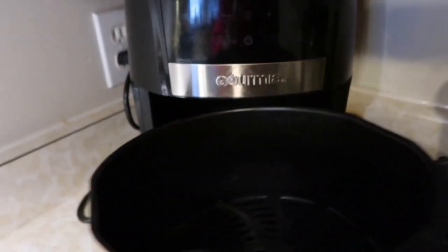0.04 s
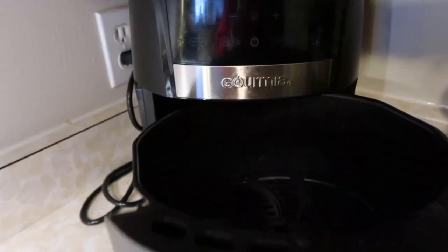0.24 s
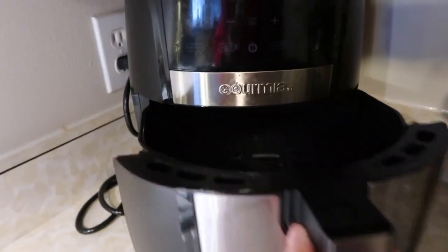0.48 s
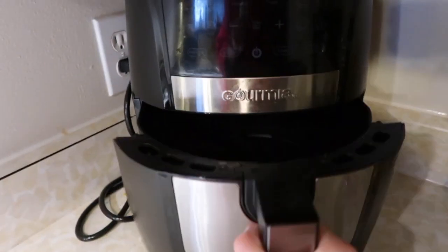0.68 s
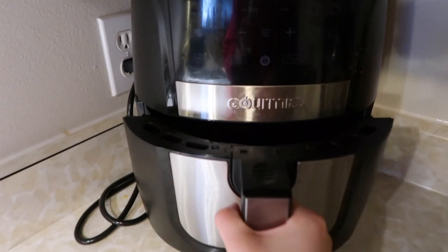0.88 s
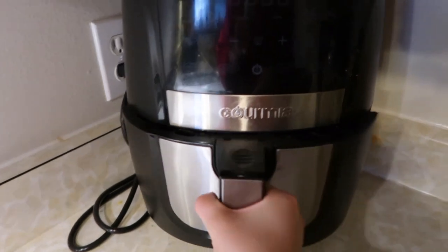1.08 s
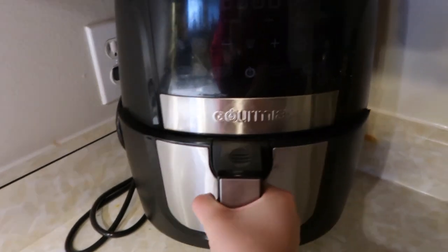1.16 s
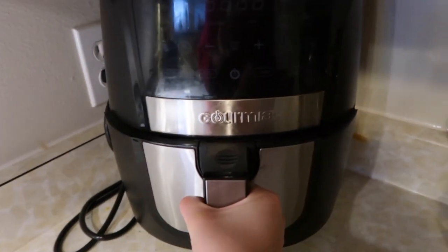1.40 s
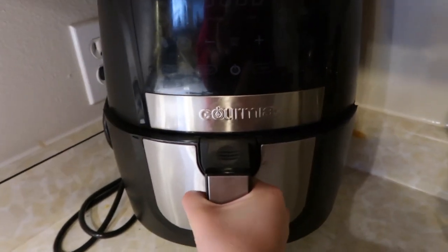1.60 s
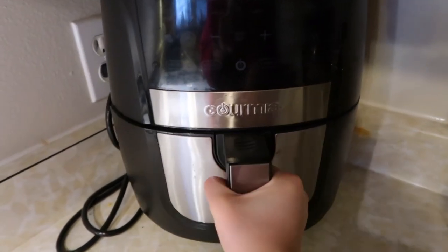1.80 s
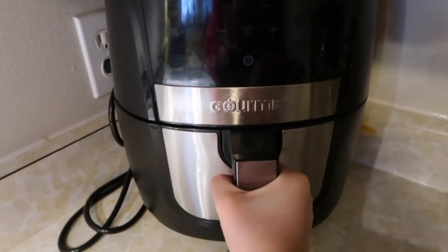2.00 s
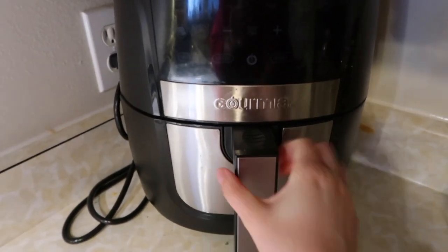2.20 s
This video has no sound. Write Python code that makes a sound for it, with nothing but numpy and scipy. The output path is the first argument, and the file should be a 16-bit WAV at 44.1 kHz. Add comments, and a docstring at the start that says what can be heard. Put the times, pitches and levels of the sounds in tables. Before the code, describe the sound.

Close up in a small, quiet kitchen, an air fryer basket clatters and rings briefly as it goes in. It slides with ticks and hollow bumps, pauses, then is pushed home until the latch clicks.

```python
"""Knocks and scrapes, a short lull, then a sharp snap: an air fryer's metal basket is being put in.
It is set on the lip of its housing, slid along the rails, and pushed until the latch snaps home.
The pan rings while it is out in the open; deeper in, the hollow plastic housing booms instead.
Plastic edges tick as they catch on the rails. Heard from close by in a small, quiet kitchen."""
import sys
import numpy as np
from scipy import signal
from scipy.fft import rfft, irfft
from scipy.io import wavfile
from scipy.ndimage import uniform_filter1d

SR = 44100
rng = np.random.default_rng(int(sys.argv[2]) if len(sys.argv) > 2 else 0)


def generate_wav(signal):
    """Clip the signal to [-1, 1] and save it as 16-bit WAV at the path in sys.argv[1]."""
    frames = np.transpose(np.atleast_2d(signal))
    scaled = np.clip(frames, -1, 1) * 32767
    pcm = np.round(scaled).astype(np.int16)
    wavfile.write(sys.argv[1], SR, pcm)


N = 99225
SIZE = 4096   # samples in one short burst or filter
T = np.arange(N) / SR
HZ = np.arange(SIZE // 2 + 1) * SR / SIZE

# The metal pan's tones. Each row: pitch in Hz, level in dB, ring time (seconds to fade by 60 dB).
PAN = [(193.1, 5, 0.14), (280.6, 4.5, 0.22), (466.6, -6, 0.27), (623, -11, 0.34), (749, 2, 0.083),
       (868, -13, 0.51), (987, -3, 0.21), (1164, -4.5, 0.31), (1400, -11, 0.29), (1470, -18.5, 0.73),
       (2030, -17.5, 0.47), (2094, -21, 0.24), (2180, -12, 0.26), (2740, -16.5, .22), (3203, -21, 0.24),
       (4160, -16, 0.12)]


def from_db(db):
    """Turn decibels into a number to multiply by."""
    return 10 ** (np.asarray(db) / 20)


def at_hz(points, hz, column=1):
    """Read between a table's rows, giving every octave the same space."""
    points = np.array(points)
    return np.interp(np.log(hz + 1), np.log(points[:, 0]), points[:, column])


def add(out, start, x):
    """Mix x in at a start time in seconds."""
    i = int(start * SR)
    out[i:i + len(x)] += x[:N - i]


def through(x, response):
    """Pass a sound through a filter, keeping its length."""
    return signal.fftconvolve(x, response)[:len(x)]


def make_filter(gain):
    """A filter with these gains that responds as early as it can (minimum phase)."""
    cepstrum = irfft(np.log(gain + 1e-9))
    cepstrum[1:SIZE // 2] *= 2
    cepstrum[SIZE // 2 + 1:] = 0
    return irfft(np.exp(rfft(cepstrum)))


def coloured(burst, colour):
    """Give a burst a new balance of bass and treble, keeping its fine detail."""
    own_colour = np.sqrt(uniform_filter1d(np.abs(rfft(burst)) ** 2, size=25) + 1e-9)
    return through(burst, make_filter(from_db(at_hz(colour, HZ)) / own_colour))


def grains(count, per_second, spread_db):
    """Random clicks of uneven size, with an average power of 1."""
    hits = rng.random(count) < per_second / SR
    sizes = from_db(spread_db * np.minimum(rng.exponential(1, count), 4))
    clicks = hits * sizes * rng.choice([-1, 1], count)
    return clicks / (clicks.std() + 1e-9)


def uneven(per_second, depth_db):
    """A level that wanders at random, with an average power of 1."""
    gain = from_db(depth_db * np.interp(T * per_second, np.arange(SIZE), rng.standard_normal(SIZE)))
    return gain / np.sqrt(np.mean(gain ** 2))


def click(db, cutoff_hz):
    """A single contact; a softer one has a lower cut-off and sounds duller."""
    lowpass = signal.butter(2, min(cutoff_hz, SR / 3), fs=SR, output="sos")
    return from_db(db) * signal.sosfilt(lowpass, signal.unit_impulse(SIZE) + 1e-18)


def ring(force, tones):
    """An object answers a force with its own fading tones."""
    t = T[:int(max(ring_s for _, _, ring_s in tones) * SR)]
    response = sum(from_db(db - 60 * t / ring_s) * np.sin(2 * np.pi * hz * t) * (-1) ** k
                   for k, (hz, db, ring_s) in enumerate(tones))
    return through(force, response)


def background_noise():
    """Faint rumble shared by both sides and microphone hiss in each; both dip midway and come back."""
    # The colours of the two noises. Each row: frequency in Hz, level in dB.
    rumble_colour = [(25, -28), (45, -21.5), (110, -34), (200, -33), (400, -50.5), (1000, -51),
                     (3000, -72.5)]
    hiss_colour = [(40, -46), (150, -42), (400, -37.5), (1000, -43), (2000, -48), (4000, -51), (8000, -61),
                   (12000, -66), (15000, -75.5)]
    # How both rise and fall. Each row: time in seconds, level in dB.
    levels = [(0, -2), (.22, -2.5), (.6, -18), (1.35, -15), (1.7, -10.5), (2.15, -4.5)]
    white = rng.standard_normal((3, N + SIZE))
    rumble, left, right = [through(noise, make_filter(from_db(at_hz(colour, HZ))))[SIZE:]
                           for noise, colour in zip(white, (rumble_colour, hiss_colour, hiss_colour))]
    return from_db(np.interp(T, *np.transpose(levels))) * (rumble + np.array([left, right]))


def kitchen_echo(sound):
    """A wash of echo that builds up quickly and lasts longest in the bass."""
    # The room's echo. Each row: frequency in Hz, level in dB, seconds to fade by 60 dB.
    room = [(48, -0.5, 1.1), (146, -13.5, 1.15), (389.6, -13, 0.5), (1087, -13.5, 0.43), (2883, -10, 0.34),
            (8130, -6.5, 0.18)]
    t, hz = T[:SR], np.arange(SR // 2 + 1)
    noise = rfft(rng.standard_normal(SR))
    centres = np.geomspace(40, 15000, 12)
    build_up = 1 - np.exp(-(t / 0.0019) ** 2)
    tail = 0
    for centre, pick in zip(centres, np.eye(len(centres))):
        share = np.interp(np.log(hz + 1), np.log(centres), pick)   # this band's part of each frequency
        fade = from_db(-60 * t / at_hz(room, centre, column=2))
        band = irfft(noise * share) * build_up * fade
        gain = from_db(at_hz(room, centre)) * np.sqrt(np.mean(share ** 2))
        tail += gain * band / np.linalg.norm(band)
    return through(sound, tail)


def rim(force):
    """The rim and rails ring briefly and brightly when knocked or rubbed."""
    # Their tones. Each row: pitch in Hz, level in dB.
    tones = [(1388, -50.5), (1483, -42), (1625, -47), (2072, -54.5), (2222, -53), (2400, -49), (2650, -54),
             (3190, -60), (3700, -50.5), (4130, -48.5), (4330, -44), (5350, -50), (6300, -42), (8480, -58)]
    ring_s = 0.04
    return ring(force, [(hz, db, ring_s) for hz, db in tones])


def scrapes():
    """The basket rubs along its rails in many tiny slips, which keep the rim and pan singing."""
    # The rubs. Each row: time of hardest rub, swell and release in seconds, level and treble in dB.
    rubs = [(0.347, 0.027, 0.015, -24.5, 13.5), (.44, 0.015, 0.11, -32.5, 5),
            (0.654, 0.086, 0.017, -25, 11), (0.714, 0.033, 0.13, -41, 19), (0.83, 0.044, 0.026, -34.5, 12),
            (0.924, 0.007, 0.017, -38.5, 15), (1.001, 0.046, 0.18, -41.5, -1), (1.13, 0.009, 0.03, -42, 5),
            (1.189, 0.02, 0.01, -29.5, 4.5), (1.222, 0.01, 0.013, -33.5, -16),
            (1.758, 0.022, 0.15, -44, 10.5), (1.858, 0.054, 0.016, -27.5, -16), (2.0, .03, 0.022, -67, -9)]
    # The colour of rubbing. Each row: frequency in Hz, level in dB.
    colour = [(40, -3), (130, 20.5), (300, 14), (700, 5.5), (1500, -4), (2500, -12), (4500, -22.5),
              (8000, -29), (11500, -35.5), (14000, -50)]
    treble_hz, rim_db, pan_db = 2520, 6.5, -39.5
    slips = grains(N, per_second=1000, spread_db=1)
    slips *= uneven(per_second=140, depth_db=1.5)   # the rub sticks and lets go
    low = signal.sosfilt(signal.butter(1, treble_hz, fs=SR, output="sos"), slips)
    treble = slips - low
    force = 0
    for peak, swell, release, db, treble_db in rubs:
        pressure = np.exp(-np.where(T < peak, ((peak - T) / swell) ** 2, (T - peak) / release))
        force += from_db(db) * pressure * (low + from_db(treble_db) * treble)
    body = make_filter(from_db(at_hz(colour, HZ)))
    rub = through(force, body / np.linalg.norm(body))
    return rub + from_db(rim_db) * rim(rub) + from_db(pan_db) * ring(force, PAN)


def catches():
    """Plastic edges catch on the rails and let go with a tick; each spot has its own pitch."""
    # The ticks. Each row: start in seconds, level in dB, a number that multiplies the edge's pitches.
    ticks = [(0.323, -29, 0.84), (0.334, -28, 0.82), (0.347, -24, 0.82), (0.5237, -31.5, 1.17),
             (0.529, -31, 0.82), (0.5371, -29.5, 0.72), (0.5781, -33.5, 1.6), (0.5936, -20.5, 0.9),
             (0.5964, -21, 1.2), (.6135, -25.5, 0.68), (0.6278, -26.5, 0.69), (0.6365, -23.5, 1.25),
             (0.644, -25.5, 0.85), (0.6486, -25.5, 0.63), (.6545, -24.5, 0.76), (0.7408, -24.5, 1.11),
             (.7715, -21.5, 0.92), (1.809, -26, 1.24), (1.8223, -30, 0.77)]
    # An edge's tones. Each row: pitch in Hz, level in dB, ring time in seconds.
    edge = [(2300, -3, .018), (3050, -5, .016), (4200, -6, .014), (5500, -9, .012), (7100, -11, .01)]
    out = np.zeros(N)
    for start, db, pitch in ticks:
        tones = [(hz * pitch, level, ring_s) for hz, level, ring_s in edge]
        add(out, start, ring(from_db(db) * signal.unit_impulse(SIZE), tones))
    return out


def latch():
    """The latch rides over its catch with a duller click, then snaps twice; its spring rings."""
    # The clicks. Each row: start in seconds, level in dB, cut-off in Hz.
    clicks = [(1.9014, -23, 4330), (1.9221, -23, 10900), (1.9275, -16.5, 5500)]
    # The spring's tones. Each row: pitch in Hz, level in dB, ring time in seconds.
    spring = [(2390, -4, 0.012), (3150, -8.5, 0.01), (4470, -3, 0.011), (5240, -8.5, 0.03),
              (6440, -9.5, 0.015), (7850, -10, 0.017), (11000, -6, .014)]
    force = np.zeros(N)
    for start, db, cutoff_hz in clicks:
        add(force, start, click(db, cutoff_hz))
    return ring(force, spring)


def knocks():
    """The basket hits the housing: tiny contacts chatter, the wall bends, pan and housing ring."""
    # The knocks. Each row: start and chatter fade time in seconds; levels of thud, clack, crack, tick,
    # pan ring and housing boom in dB; the bending wall's pitch in Hz and its level in dB.
    hits = [(0.219, 0.015, 27, 17, 2, -13, -20.5, -27.5, 168, -6),
            (.232, 0.04, 30, 15, 2.5, -27.5, -32.5, -19.5, 175, 0),
            (0.2846, 0.0044, 34, 33, 14, -16, -18, -26, 670, -4.5),
            (.309, 0.032, 35.5, 11.5, 6, -12, -65, -50, 119, -15.5),
            (0.404, 0.058, 25, 11.5, 1, -22, -33, -29.5, 450, -17),
            (0.5211, 0.0096, 24, 23, 4, -25, -25, -30, 99, -15.5),
            (.529, 0.024, 30.5, 18.5, 10, -19.5, -36, -45, 663, -13),
            (0.576, 0.032, 4, 12.5, 11, -10, -43, -38, 355, -37),
            (.591, 0.0086, 34.5, 14, 16, -11, -22, -32, 131.5, -8.5),
            (0.611, 0.014, 13, 28.5, 0, -11, -33, -40, 148.7, -4.5),
            (.634, 0.019, 19, 23.5, 11.5, -2.5, -27, -18.5, 288, -21),
            (0.648, 0.013, 24.5, 23.5, 14, -32, -32, -25, 190.3, -2),
            (.738, 0.018, 37, 22, 9.5, -8, -24, -25.5, 796, -6.5),
            (.768, 0.0098, 32.5, 20.5, 15, -24, -26, -31, 442, -10.5),
            (0.7746, 0.0038, 28, 23, 0.5, -14, -56, -30, 384, -8.5),
            (.806, 0.021, 13, 15, 0, -20, -33.5, -38, 489, -14),
            (0.872, 0.014, 0, 5, -5, -25, -46, -45, 530, -30),
            (1.041, 0.015, 15.5, 4, -12, -36, -36, -29.5, 290, -41),
            (1.06, 0.015, 25, 5.5, -5.5, -29, -38.5, -33, 194, -10.5),
            (1.077, 0.02, 29, -2, 0.5, -24.5, -40.5, -37, 222.3, -27.5),
            (1.115, 0.021, 15.5, -11, -10.5, -22, -47, -30.5, 182, -18),
            (1.173, 0.055, 18, 1.5, 4.5, -26.5, -56, -32.5, 433, -19.5),
            (1.191, .018, 25.5, 20, -5.5, -28, -34.5, -23.5, 190.4, -6),
            (1.216, 0.0058, 28.5, 7.5, 8.5, -33.5, -51, -18.5, 208, -15),
            (1.229, 0.014, 28.5, 10.5, -4.5, -43, -48.5, -27.5, 163.5, -10),
            (1.656, 0.052, -2.5, -18.5, -34.5, -54, -68.5, -48.5, 668, -46.5),
            (1.778, 0.059, 16, 5.5, -10, -23, -58, -38.5, 142, -13),
            (1.801, 0.032, 23.5, 18.5, 9.5, -14, -36, -17, 199.4, -6.5),
            (1.829, 0.015, 31, 20.5, -3.5, -30, -29, -18.5, 181, -2),
            (1.902, 0.034, 7, 11, 9.5, -10, -41, -50, 772, -33),
            (1.917, 0.0087, 13.5, 21, -8, -9, -49, -26.5, 123, -7),
            (1.9212, 0.0086, 31.5, 1.5, 9, 0.5, -42, -29, 121.3, -9.5),
            (1.929, 0.0071, 20, 5, 8.5, -4, -50, -29.5, 398, -28)]
    # Where thud, clack, crack and tick lie, in Hz.
    band_hz = [170, 700, 2400, 8000]
    # The hollow housing's tones. Each row: pitch in Hz, level in dB, ring time in seconds.
    housing = [(46, -23, 0.33), (91.8, -7.5, 0.4), (142, -4, 0.24), (174, 4, 0.23), (167.2, -15, 0.92),
               (206.9, 0, 0.28), (223.2, -16.5, 0.93), (277.1, -7, 0.25), (377, -17, 0.42),
               (416.1, -5, 0.18), (470, -16.5, 0.12), (759.4, -6, 0.0613)]
    force, flex, on_pan, on_housing = np.zeros((4, N))
    t = T[:SIZE]
    for start, decay, thud, clack, crack, tick, pan_db, housing_db, flex_hz, flex_db in hits:
        build_up = 1 - np.exp(-t / (0.088 * decay))
        fade = np.exp(-(t / decay) ** 1.16)
        chatter = grains(SIZE, per_second=2500, spread_db=1) * build_up * fade
        # Pairs of Hz and dB: the knock falls away below the thud and above the tick.
        colour = [(24.3, thud - 23), (48.6, thud - 11.5), (96, thud - 7.5),
                  *zip(band_hz, (thud, clack, crack, tick)),
                  (12300, tick - 12), (14030, tick - 20.5)]
        add(force, start, coloured(chatter, colour))
        flex_ring_s = 0.052 + 7.4 / flex_hz   # a set time plus 7.4 swings of the wall
        flex_level = build_up * from_db(flex_db - 60 * t / flex_ring_s)
        add(flex, start, flex_level * np.sin(2 * np.pi * flex_hz * t))
        add(on_pan, start, click(pan_db, cutoff_hz=890 * from_db(crack)))   # more crack, brighter blow
        add(on_housing, start, from_db([housing_db]))
    boom = ring(on_housing, housing) * uneven(per_second=28, depth_db=2)   # wavers as it dies
    return force + flex + rim(force) + ring(on_pan, PAN) + boom


def basket_in_kitchen():
    """All the basket's sounds plus their echo, with fresh random detail on each call."""
    basket = knocks() + scrapes() + catches() + latch()
    return basket + kitchen_echo(basket)


def scene():
    """The basket, centred in the bass and wide in the treble, over faint rumble and microphone hiss."""
    # Stereo width. Each row: frequency in Hz, level of the side signal against the middle in dB.
    width = [(60, -56.5), (200, -42), (400, -26.5), (1300, -18), (2400, -11.5), (4400, -5.5), (8100, 0.5),
             (14000, 10)]
    smear_s = 0.00065
    mid = basket_in_kitchen()
    smear = rng.standard_normal(SIZE) * np.exp(-T[:SIZE] / smear_s)
    side = through(basket_in_kitchen(), coloured(smear, width))
    return np.array([mid + side, mid - side]) + background_noise()


def record(dry):
    """Cut the deepest rumble, round off the tallest peaks, then cut the highest treble."""
    low_cut_hz, high_cut_hz = 30, 15800
    x = signal.sosfilt(signal.butter(2, low_cut_hz, "high", fs=SR, output="sos"), dry)
    rounded = x / (1 + (x / .95) ** 6) ** (1 / 6)
    return signal.sosfilt(signal.cheby2(12, 70, high_cut_hz, fs=SR, output="sos"), rounded)


dry = scene()
out = record(dry)
generate_wav(out)
```